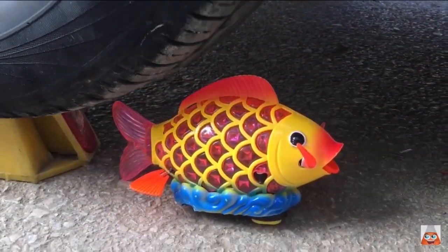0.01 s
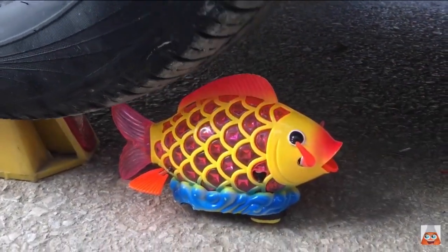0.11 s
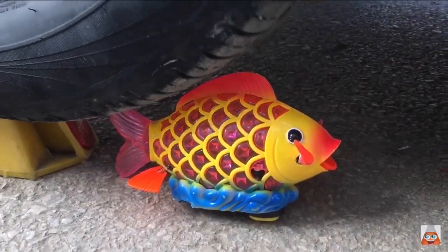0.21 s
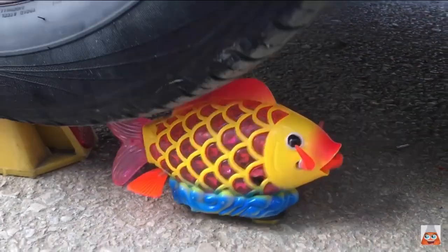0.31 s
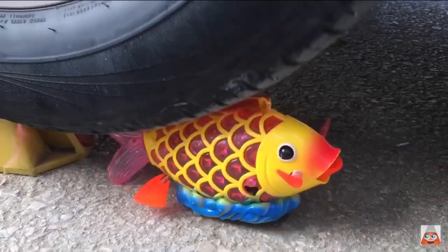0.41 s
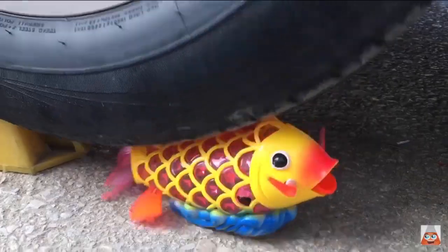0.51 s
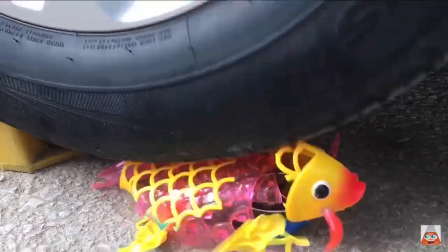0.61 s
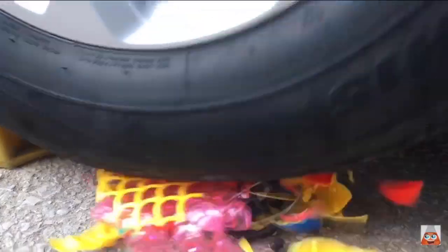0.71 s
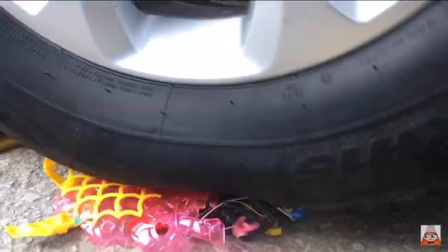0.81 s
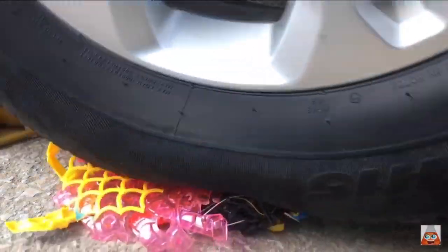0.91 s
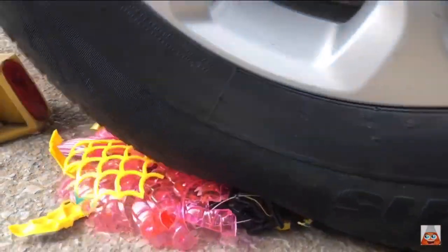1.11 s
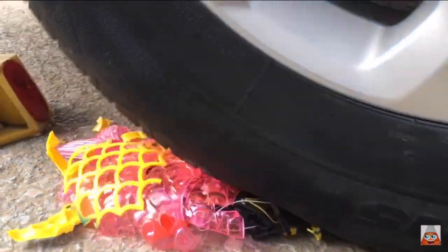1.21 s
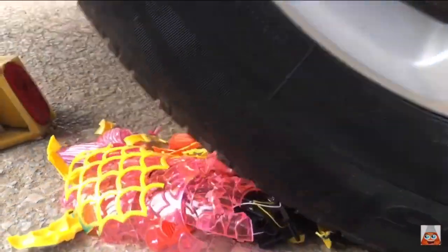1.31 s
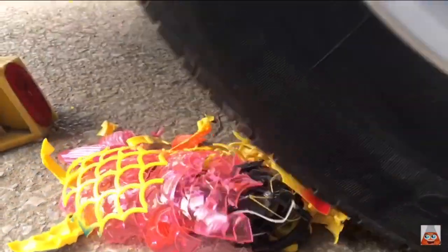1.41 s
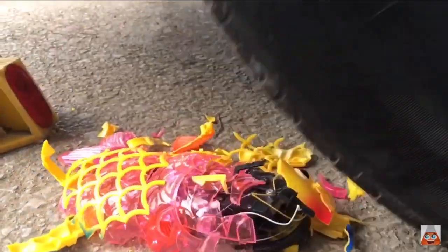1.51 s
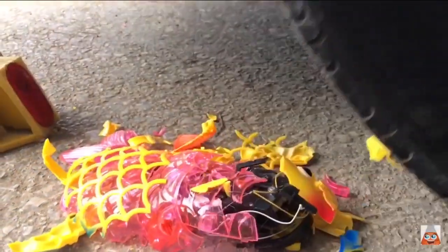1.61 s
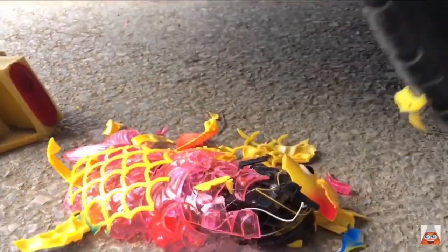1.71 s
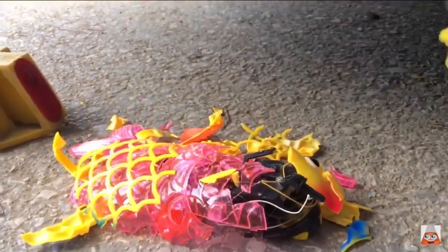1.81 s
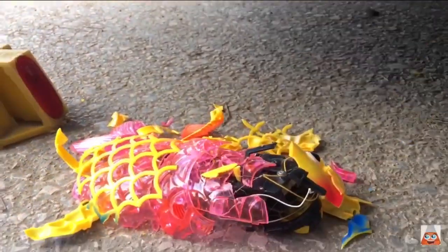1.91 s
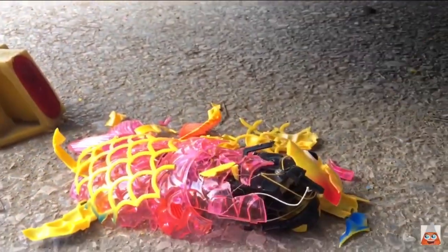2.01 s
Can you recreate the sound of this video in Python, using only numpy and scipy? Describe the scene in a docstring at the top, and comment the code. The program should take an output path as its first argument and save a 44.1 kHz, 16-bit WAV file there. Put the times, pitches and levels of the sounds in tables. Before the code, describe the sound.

A hollow plastic toy is crushed by a slow car tyre on concrete, heard very close. Faint scuffing and low engine rush come first; from 0.2 to 0.8 seconds, dense, harsh cracking and crunching with hollow thumps, slightly overloaded. Separate sharp snaps and knocks follow until about 1.3, strongest near 1.1. Then sparse tiny ticks, the engine rumble rising again, and a small bright shard clink at 1.8.

```python
"""On concrete, close to one microphone: a car tyre rolls slowly over a hollow plastic toy.
Noise under crackling envelopes makes the splits and the crunch; falling sines make the thumps as it caves in.
Flattened pieces snap (short coloured noise) and knock (damped notes with a rasp); loose shards tinkle as sines.
Shaped noise gives the scuffing tread and the engine running low behind, with a faint sine hum.
Short reflections surround the toy, and the loudest cracks overload."""
import sys
import numpy as np
from scipy import signal
from scipy.fft import rfft, irfft, next_fast_len
from scipy.io import wavfile
from scipy.ndimage import uniform_filter1d, map_coordinates

SR = 44100
rng = np.random.default_rng(int(sys.argv[2]) if len(sys.argv) > 2 else 0)


def inscribe(sig):
    """Save sig as 16-bit PCM at rate SR to the path in sys.argv[1].

    A 1-D sig is mono; a 2-D sig holds one channel per row.
    Samples are clipped to [-1, 1] before scaling.
    """
    pcm = np.round(np.clip(np.atleast_2d(sig).T, -1, 1) * 32767)
    wavfile.write(sys.argv[1], SR, pcm.astype(np.int16))


N = 90405
T = np.arange(SR // 5) / SR  # time axis of one short sound, s

# Rubber scuffing on grit: time_s, level_db (before the flutter)
TREAD_LEVEL = [(0, -35.5), (.04, -40.5), (.06, -44), (.085, -36.5), (.11, -50), (.125, -39), (.145, -40),
               (.165, -35), (.8, -46.5), (1.0, -39), (1.22, -51), (1.33, -34.5), (1.41, -42), (1.48, -45),
               (1.55, -50.5), (1.75, -44), (1.9, -51), (2.05, -47)]
# Spectrum of the scuff: frequency_hz, level_db
SCUFF_SPECTRUM = [(100, -12), (800, -3), (2300, 0.5), (4200, 1), (5200, 1), (8500, 2), (10500, -5.5),
                  (13000, -2.5), (15500, -11)]
# Time within which splinters drop: first_s, last_s
SPLINTER_SPAN_S = (1.28, 1.76)
# The car behind: time_s, engine_bay_rush_db, exhaust_rumble_db
CAR_LEVELS = [(0, -31.5, -35.5), (.17, -30.5, -32), (.5, -31.5, -35), (.82, -51, -43), (1.05, -47, -47.5),
              (1.22, -48.5, -46), (1.33, -48, -47.5), (1.53, -41.5, -41), (1.66, -38, -31),
              (1.82, -33, -27.5), (2.05, -36, -30.5)]
# Spectrum of the engine-bay rush: frequency_hz, level_db
RUSH_SPECTRUM = [(60, 11), (200, 4.5), (350, 0), (600, 3.5), (1200, 4), (2300, 4), (4000, -2), (5200, -6),
                 (8500, -13.5), (10500, -33.5), (15500, -38)]
# Spectrum of the exhaust rumble: frequency_hz, level_db
RUMBLE_SPECTRUM = [(20, -24), (40, -4), (58, 2), (80, 5.5), (110, -11), (150, -6.5), (230, -16.5),
                   (400, -18), (1000, -82)]
# Crunch of fragments under the tyre: time_s, level_db
GRIND_LEVEL = [(.17, -55), (.22, -18.5), (.27, -38), (.335, -26.5), (.385, -33), (.45, -26), (.51, -30),
               (.55, -13), (.59, -26), (.64, -21), (.68, -15), (.76, -11), (.785, -37), (.82, -62),
               (.86, -90)]
# Spectrum shared by splits and crunch: frequency_hz, level_db
CRACK_SPECTRUM = [(60, 0), (250, -19), (800, -7.5), (1600, -5), (3500, 0.5), (4400, 0), (5000, -3),
                  (6200, 0.5), (7400, -6), (8800, 0.5), (10400, -6.5), (12000, -0.5), (15500, -8.5)]
# Loose shards ring: start_s, level_db, base_pitch_hz
SHARD_HITS = [(.1895, -20, 8600), (.8415, -24, 10000), (.9615, -19.5, 4000), (1.011, -35, 4150),
              (1.424, -34, 8300), (1.431, -31, 8230), (1.469, -29, 8600), (1.613, -38, 8400),
              (1.701, -30.5, 9270), (1.745, -37, 8300), (1.806, -23, 3780), (1.8193, -16, 3480),
              (1.8221, -20.5, 3710)]
# Modes of a shard: ratio_to_base_pitch, level_db (before random scatter)
SHARD_RING_MODES = [(1.001, 2.5), (1.079, -2.5), (1.31, -21), (1.6, -32)]
# Single snaps: start_s, level_db, emphasis_hz, t60_s
SNAP_HITS = [(0.1911, -9.5, 8500, 0.012), (0.2003, -4, 13000, 0.015), (0.207, -10, 8600, 0.021),
             (0.2136, -10, 12000, 0.015), (.324, -19, 3000, 0.021), (0.3922, -17, 4000, .025),
             (0.4015, 3, 2410, 0.011), (.823, -26, 3900, 0.011), (0.8413, -15.5, 5760, 0.015),
             (.8525, -26, 13000, .012), (.8607, -8, 2500, .014), (0.862, -14, 12000, 0.014),
             (.8985, -11.5, 3660, 0.0088), (.9095, -24, 9000, .012), (.934, -24, 6000, 0.061),
             (0.94, -15, 14500, 0.014), (0.9611, -8, 12500, 0.02), (0.979, -27, 3800, 0.033),
             (1.009, -23, 3240, 0.057), (1.02, -24, 10900, 0.015), (1.0609, -2.5, 8800, 0.013),
             (1.0875, -11.5, 7400, 0.013), (1.1165, -2.5, 6800, 0.019), (1.1504, -4.5, 4170, 0.0035),
             (1.166, -25, 3700, 0.11), (1.2609, -16, 4240, 0.014), (1.2602, -14, 8100, 0.032),
             (1.285, -25.5, 3520, 0.016), (1.293, -22, 6300, 0.017), (1.353, -24.5, 6200, 0.016),
             (1.428, -29, 11000, 0.072), (1.469, -28, 13000, .025), (1.479, -24, 4440, 0.031),
             (1.51, -31, 7800, 0.018), (1.681, -28, 6000, 0.012), (1.702, -23.5, 6900, 0.031),
             (1.762, -20.5, 3760, 0.023)]
# Spectrum of a snap before its own emphasis: frequency_hz, level_db
SNAP_SPECTRUM = [(100, -32), (300, -25), (700, -2.5), (1600, -2), (3000, -1), (4000, 1.5), (8000, -3),
                 (10500, -1.5), (15500, 0.5)]
# The shell splits: start_s, hold_s, level_db, treble_tilt_db_per_octave
SHELL_SPLITS = [(0.2253, 0.01, -1, -3.5), (0.2365, 0.0054, -12, -5.5), (0.248, 0.0055, -12, -2),
                (0.284, 0.018, -6, -.5), (.301, 0.017, -11.5, -3), (0.3505, 0.012, -8.5, -1.5),
                (0.3597, 0.0056, -8, -1), (0.402, 0.0056, -7, -1), (0.4186, 0.0014, -13, -5.5),
                (0.4235, 0.0065, -11.5, -1), (0.4313, 0.0028, -14.5, -1), (0.4578, 0.011, -4, -3),
                (.4822, 0.0018, -23, 0), (0.499, 0.0037, -7, 0.5), (0.517, 0.0017, -4, -0.5),
                (0.5253, 0.017, -8, -1), (0.5595, 0.0025, -7, -0.5), (0.5723, 0.0024, -9.5, -0.5),
                (0.582, 0.0015, -12, 0), (0.595, 0.011, -6.5, -2.5), (0.603, .002, -6, 15),
                (0.6206, .004, -5, 1), (0.6483, 0.003, -8.5, 7), (.653, 0.0039, -4, 1),
                (0.664, 0.0028, -8, -0.5), (0.675, 0.0036, -7, -0.5), (0.683, 0.016, -10, 0.5),
                (.701, 0.0018, -4, 1), (0.7102, 0.0074, -13.5, -1.5), (0.734, 0.0016, -6.5, 1.5),
                (0.742, .001, -11, 5), (0.746, 0.0096, -13, 1), (0.761, 0.0044, -14, -1)]
# Ringing modes of the hollow shell: pitch_hz, relative_level_db, t60_s
SHELL_MODES = [(890, -14, 0.15), (1160, -2, 0.048), (1395, 10, 0.056), (2147, 3.5, .09), (2250, 5, .08),
               (2720, 12.5, 0.038), (3100, 6, .08), (3270, 3.5, 0.093), (3660, -14, 0.076),
               (3800, 10.5, 0.049), (4250, -14, 0.076), (4640, 12, 0.081)]
# The hollow body caves in: start_s, level_db, pitch_fall_s
CAVE_INS = [(.227, -7, 0.0026), (.288, -5.5, 0.0038), (.305, -5.5, 0.0012), (.358, -16, 0.0029),
            (.401, -5.5, 0.0028), (0.462, -9, 0.00316), (.527, -4.5, .004), (.558, -13.5, .002),
            (0.575, -9.5, 0.0013), (0.595, -22, 0.0014), (.608, -5.5, 0.00093), (.622, -11, 0.0013),
            (.648, -6, 0.0021), (.655, -1, 0.0017), (0.684, -6, 0.001403), (.690, -8, 0.0011),
            (0.734, -7, 0.0022), (0.749, -6.5, .0025), (0.9617, -15, 0.0008), (1.116, -9.5, .0013)]
# Pieces knock on the ground: start_s, level_db, pitch_hz
GROUND_KNOCKS = [(0.2743, -12, 1260), (.2925, -3.5, 720), (0.344, -8, 1000), (.384, -22, 1015),
                 (0.4014, 0, 398), (0.4336, -0.5, 940), (.516, 0.5, 2150), (.749, -2.5, 500),
                 (.8232, -21, 940), (0.8601, -14, 644), (0.8989, -16, 684), (0.9093, -12, 745),
                 (0.946, -22, 1320), (.9615, -19, 396), (1.061, -8.5, 776), (1.117, -6.5, 970),
                 (1.1181, -10.5, 497), (1.1505, -22, 845)]
# Decay of the reflections around the toy: frequency_hz, t60_s
YARD_DECAY = [(100, 0.056), (1000, 0.13), (5000, 0.09), (15000, 0.044)]

SCUFF_FLUTTER_DB, SCUFF_FLUTTER_PER_S = 5.5, 38
SPLINTER_DB, SPLINTER_HZ, SPLINTER_T60_S = -40, 9500, 0.02  # middle level and pitch, decay
PATCHY_DB, PATCH_BINS, PATCH_FRAMES = 2.8, 3, 7  # rms swing and smoothing of the noise patches
RUMBLE_LUMPS_DB, RUMBLE_LUMPS_PER_S = 6.5, 35
HUM_HZ, HUM_DB = 190, -55
CRACK_T60_S = .0045
SHARD_T60_S = 0.03
SNAP_PEAK_DB, SNAP_WIDTH_OCT, SNAP_SKIRT_DB_PER_OCT = 6.5, .25, 2.5
SNAP_FRONT_DB, SNAP_FRONT_T60_S = -2, .005
SPLIT_CRACKS_PER_S, SPLIT_RELEASE_T60_S = 800, .028
FRAGMENT_COLOUR_DB, FRAGMENT_KNOT_HZ = 2.5, 584
SHELL_DB = -18.5
FALL_RANGE_HZ, FALL_END_HZ = 2500, 39.2  # the thump starts at their sum
THUMP_T60_S, THUMP_T60_PER_FALL = 0.058, 7.4  # a slower fall rings longer
FALL_ROUGH, FALL_ROUGH_PER_S, FALL_ROUGH_HALF_HZ = .55, 498, 560  # torn at the start, smooth in the bass
KNOCK_T60_S, KNOCK_ATTACK_S = .012, .0003
KNOCK_RASP_DB, KNOCK_RASP_T60_S, KNOCK_WIDTH_OCT = -7, .028, .6
YARD_DB = -13.5
OVERLOAD, TOP_HZ = 0.83, 15800  # ceiling of the recorder (full scale is 1) and its band limit


def amp(db):
    """Decibels to gain."""
    return 10 ** (np.asarray(db) / 20)


def unit(x):
    """Scale to rms 1."""
    return x / np.sqrt(np.mean(x ** 2) + 1e-20)


def along(points, hz):
    """Read (Hz, value) points on a log frequency axis."""
    point_hz, value = np.transpose(points)
    return np.interp(np.log(hz + 1), np.log(point_hz + 1), value)


def curves(rows):
    """One value per sample for each column after the time."""
    s, *columns = np.transpose(rows)
    return [np.interp(np.arange(N) / SR, s, column) for column in columns]


def noise(colour, size):
    """Noise of rms 1, white noise shaped by the spectrum colour(Hz) in dB."""
    spectrum = rfft(rng.standard_normal(size))
    gain = amp(colour(np.fft.rfftfreq(size, 1 / SR)))
    return unit(irfft(spectrum * gain, size))


def fade(t60, hold=0):
    """Full level while held, then an exponential decay."""
    return amp(-60 * np.maximum(T - hold, 0) / t60)


def add(track, s, sound):
    """Mix a sound in at time s, cut at the end of the track."""
    part = track[max(0, round(s * SR)):][:len(sound)]
    part += sound[:len(part)]


def wobble(rate, size):
    """A smooth random curve, rate knots a second."""
    knots = rng.standard_normal(SR // 8)
    return map_coordinates(knots, [np.arange(size) * rate / SR], mode="wrap")


def patchy(x):
    """Let narrow bands of a noise swell and sink on their own; rms 1."""
    z = signal.stft(x, nperseg=512)[2]
    field = uniform_filter1d(rng.standard_normal(z.shape), PATCH_BINS, axis=0)
    field = uniform_filter1d(field, PATCH_FRAMES, axis=1)
    return unit(signal.istft(z * amp(PATCHY_DB * unit(field)), nperseg=512)[1][:N])


def tread(count=45):
    """The tread scuffs unevenly over the ground and drops tiny ringing splinters as it leaves the toy."""
    level_db, = curves(TREAD_LEVEL)
    flutter_db = SCUFF_FLUTTER_DB * wobble(SCUFF_FLUTTER_PER_S, N)
    out = amp(level_db + flutter_db) * patchy(noise(lambda hz: along(SCUFF_SPECTRUM, hz), N))
    starts = rng.uniform(*SPLINTER_SPAN_S, count)
    for s, (size, pitch) in zip(starts, rng.standard_normal((count, 2))):
        hz = SPLINTER_HZ * 2 ** (.4 * pitch)
        level = amp(SPLINTER_DB + 2.7 * size)
        add(out, s, level * np.sin(2 * np.pi * hz * T) * fade(SPLINTER_T60_S))
    return out


def car():
    """Lumpy exhaust rumble, a faint steady hum and the rush of the engine bay."""
    rush_db, rumble_db = curves(CAR_LEVELS)
    rush = amp(rush_db) * patchy(noise(lambda hz: along(RUSH_SPECTRUM, hz), N))
    lumps = amp(RUMBLE_LUMPS_DB * wobble(RUMBLE_LUMPS_PER_S, N))
    rumble = amp(rumble_db) * unit(lumps * noise(lambda hz: along(RUMBLE_SPECTRUM, hz), N))
    hum = amp(HUM_DB) * np.sin(2 * np.pi * HUM_HZ * np.arange(N) / SR)
    return rush + rumble + hum


def crackle(size, rate, scatter_db):
    """Envelope of rms 1: tiny cracks of uneven strength at random moments, summed as power."""
    strikes = rng.random(size) < rate / SR
    power = strikes * amp(scatter_db * rng.standard_normal(size)) ** 2
    return unit(np.sqrt(np.abs(signal.fftconvolve(power, fade(CRACK_T60_S) ** 2)[:size])))


def grinding():
    """Fragments crunch between rubber and concrete: patchy noise under a dense crackle."""
    level_db, = curves(GRIND_LEVEL)
    grains = crackle(N, rate=500, scatter_db=2.5)
    return amp(level_db) * grains * patchy(noise(lambda hz: along(CRACK_SPECTRUM, hz), N))


def shards():
    """Freed shards land and ring briefly in a few sine modes of slightly random level."""
    out = np.zeros(N)
    for s, db, base_hz in SHARD_HITS:
        ring = np.zeros(len(T))
        for ratio, mode_db in SHARD_RING_MODES:
            ring += amp(mode_db + rng.normal(0, 1.5)) * np.sin(2 * np.pi * base_hz * ratio * T)
        add(out, s, amp(db) * ring * fade(SHARD_T60_S))
    return out


def snaps():
    """Single brittle breaks: a sharp front, then a short noisy ring emphasised at the pitch of the piece."""
    out = np.zeros(N)
    for s, db, peak_hz, t60 in SNAP_HITS:

        def colour(hz):
            octaves_away = np.abs(np.log2((hz + 1) / peak_hz))
            peak = SNAP_PEAK_DB * np.exp(-.5 * (octaves_away / SNAP_WIDTH_OCT) ** 2)
            return along(SNAP_SPECTRUM, hz) + peak - SNAP_SKIRT_DB_PER_OCT * octaves_away

        ring = fade(t60)
        shape = ring + amp(SNAP_FRONT_DB) * fade(SNAP_FRONT_T60_S)
        shape *= np.linalg.norm(ring) / np.linalg.norm(shape)  # the front adds no energy
        add(out, s, amp(db) * noise(colour, len(T)) * shape)
    return out


def fragment(hz):
    """The random spectral peaks and dips of one piece of plastic, in dB."""
    knots = rng.standard_normal(256)
    return FRAGMENT_COLOUR_DB * map_coordinates(knots, [hz / FRAGMENT_KNOT_HZ], mode="wrap")


def splits():
    """Each split opens with a crack and runs on as a chain of smaller ones."""
    out = np.zeros(N)
    for s, hold, db, tilt_db in SHELL_SPLITS:

        def colour(hz):
            tilt = tilt_db * np.log2((hz + 500) / 4000)
            return along(CRACK_SPECTRUM, hz) + fragment(hz) + tilt

        hiss = noise(colour, len(T))
        gate = fade(SPLIT_RELEASE_T60_S, hold)
        chain = gate * (crackle(len(T), SPLIT_CRACKS_PER_S, scatter_db=1) + fade(CRACK_T60_S))
        chain *= np.linalg.norm(gate) / np.linalg.norm(chain)  # same energy as the plain gate
        add(out, s, amp(db) * hiss * chain)
    return out


def shell(cracks):
    """The hollow body rings along with its cracks: they excite a bank of damped modes."""
    ring = sum(amp(db) * np.sin(2 * np.pi * hz * T) * fade(t60) for hz, db, t60 in SHELL_MODES)
    return amp(SHELL_DB) * signal.fftconvolve(cracks, ring / np.linalg.norm(ring))[:N]


def collapses():
    """A wall gives way: a torn thud whose pitch falls to the deep bass."""
    out = np.zeros(N)
    for s, db, fall in CAVE_INS:
        hz = FALL_END_HZ + FALL_RANGE_HZ / (1 + T / fall) ** 2
        rough = FALL_ROUGH * hz / (hz + FALL_ROUGH_HALF_HZ)
        phase_jitter = np.pi * rough * wobble(FALL_ROUGH_PER_S, len(T))
        phase = 2 * np.pi * np.cumsum(hz) / SR + phase_jitter
        swell = (1 - rough) * (1 + 2 * rough * wobble(FALL_ROUGH_PER_S, len(T)))
        decay = fade(THUMP_T60_S + THUMP_T60_PER_FALL * fall)
        add(out, s, amp(db) * swell * np.sin(phase) * decay)
    return out


def knocks():
    """Pieces pinned by the tyre strike the ground: a damped note and a rasp around it."""
    out = np.zeros(N)
    attack = 1 - np.exp(-T / KNOCK_ATTACK_S)
    for s, db, hz in GROUND_KNOCKS:

        def colour(f):
            widths_away = np.log2((f + 1) / hz) / KNOCK_WIDTH_OCT
            return -30 * np.log10(1 + widths_away ** 2)

        note = np.sin(2 * np.pi * hz * T) * fade(KNOCK_T60_S)
        rasp = amp(KNOCK_RASP_DB) * noise(colour, len(T)) * fade(KNOCK_RASP_T60_S)
        add(out, s, amp(db) * (note + rasp) * attack)
    return out


def yard(toy):
    """Short reflections between ground and car's underside: a noise tail with its own decay per band."""
    hz, t, z = signal.stft(rng.standard_normal(len(T)), SR, nperseg=256)
    decay = amp(-60 * t / along(YARD_DECAY, hz)[:, None])
    tail = signal.istft(z * decay, SR, nperseg=256)[1]
    return amp(YARD_DB) * signal.fftconvolve(toy, tail / np.linalg.norm(tail))[:N]


def scene():
    """The breaking toy in front of the car, the same in both channels."""
    crunch = splits() + grinding()
    toy = crunch + shell(crunch) + snaps() + knocks() + shards() + collapses()
    return np.tile(toy + yard(toy) + tread() + car(), (2, 1))


def record(dry):
    """The recorder rounds off the highest peaks and keeps nothing above its band limit."""
    clipped = dry / (1 + np.abs(dry / OVERLOAD) ** 6) ** (1 / 6)
    size = next_fast_len(N + len(T))
    in_band = np.fft.rfftfreq(size, 1 / SR) < TOP_HZ
    return irfft(rfft(clipped, size) * in_band, size)[:, :N]


dry = scene()
out = record(dry)
inscribe(out)
```